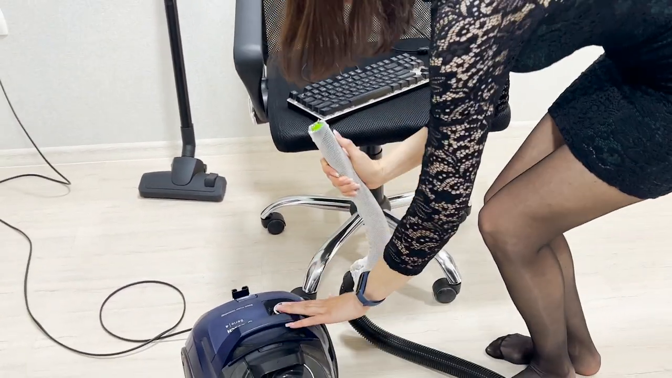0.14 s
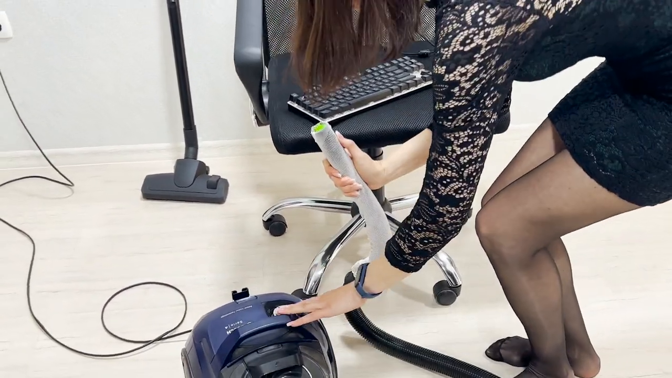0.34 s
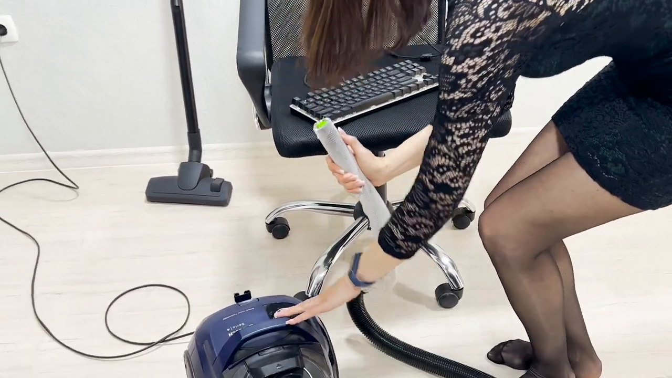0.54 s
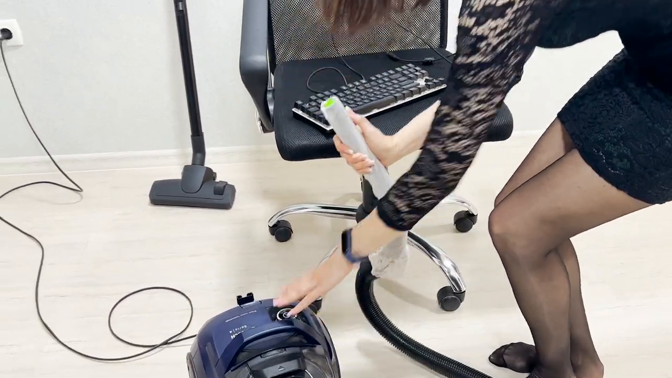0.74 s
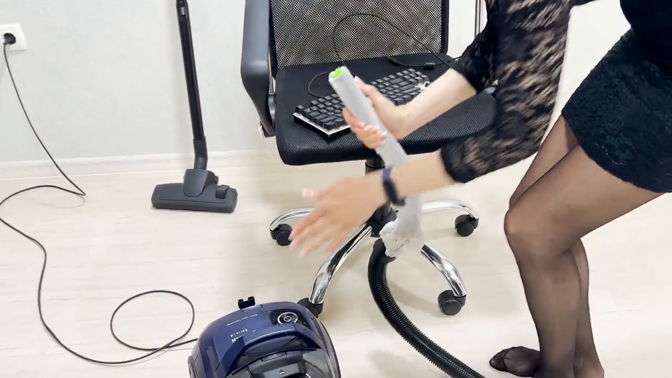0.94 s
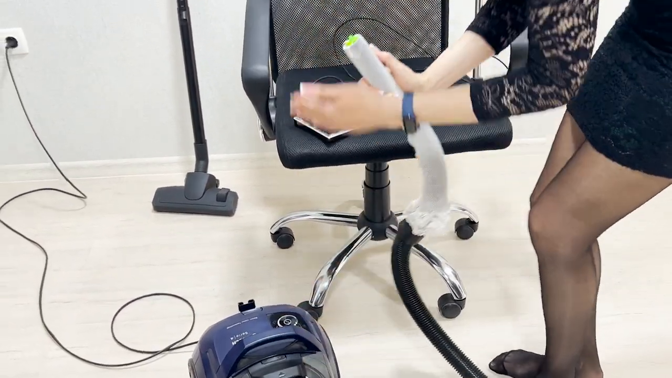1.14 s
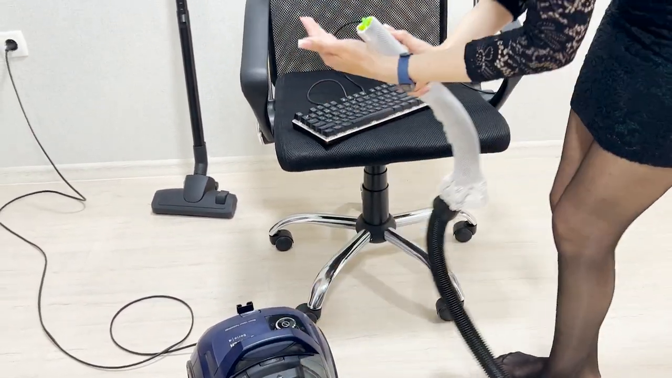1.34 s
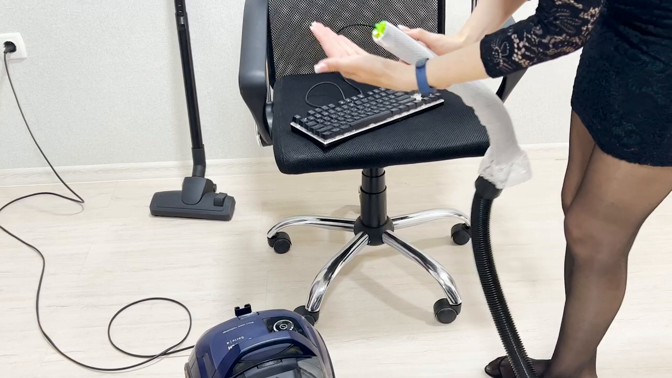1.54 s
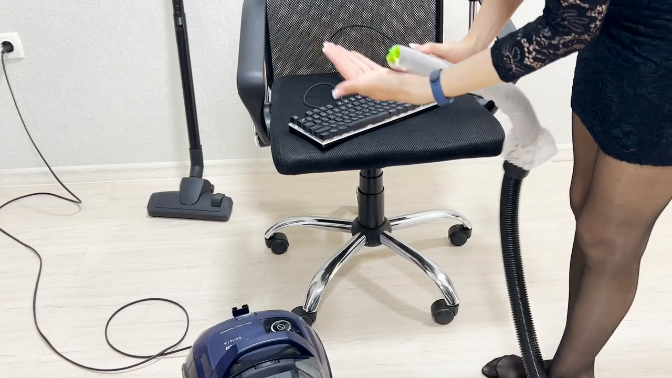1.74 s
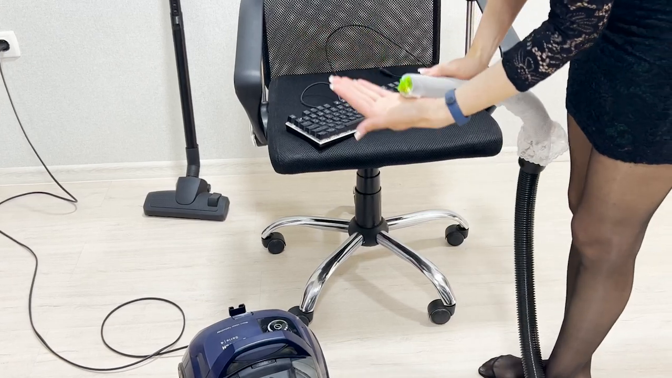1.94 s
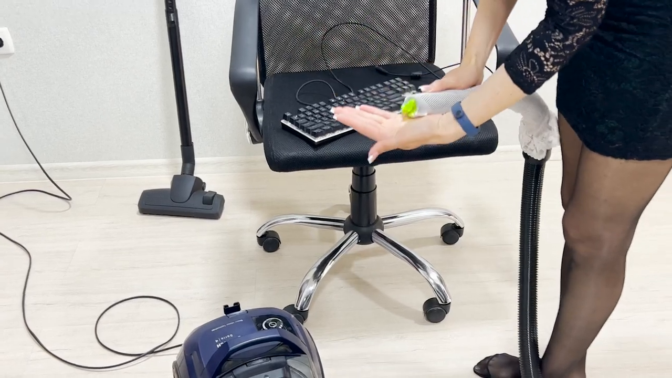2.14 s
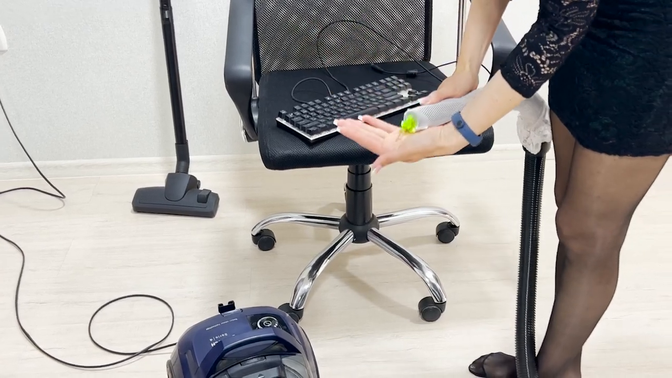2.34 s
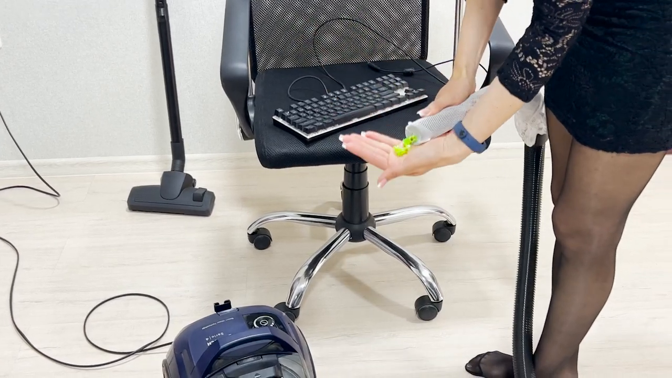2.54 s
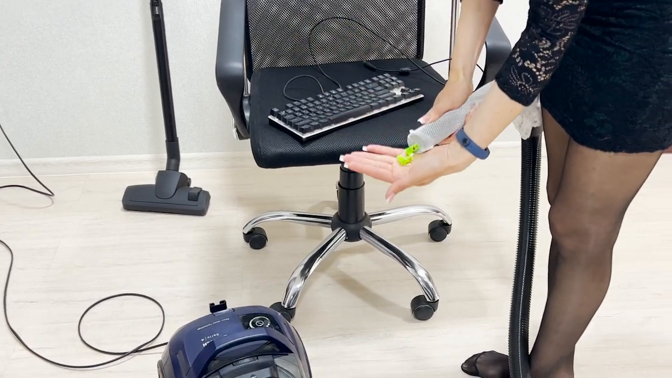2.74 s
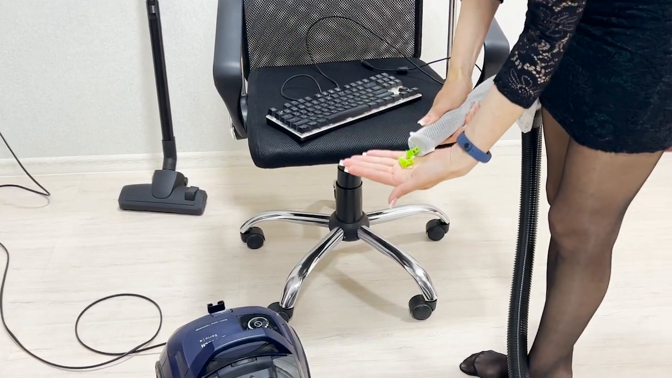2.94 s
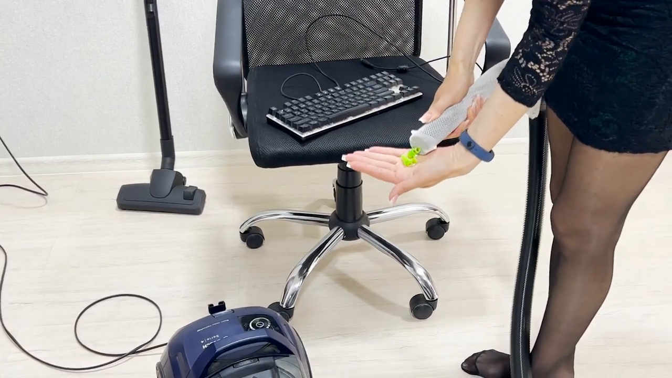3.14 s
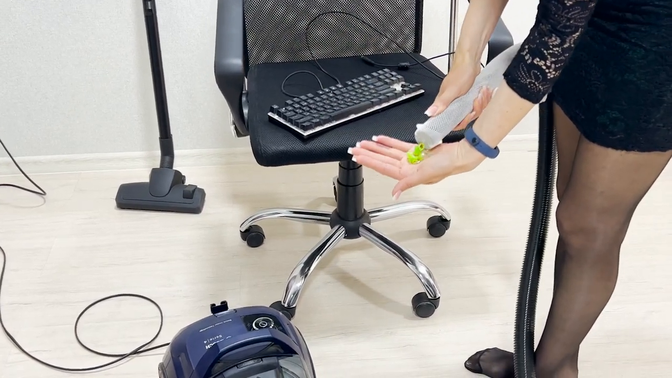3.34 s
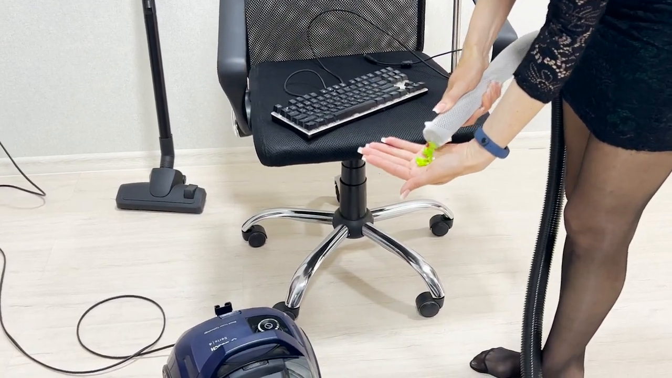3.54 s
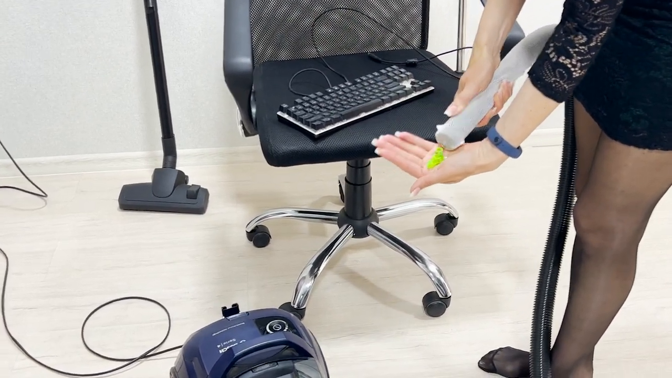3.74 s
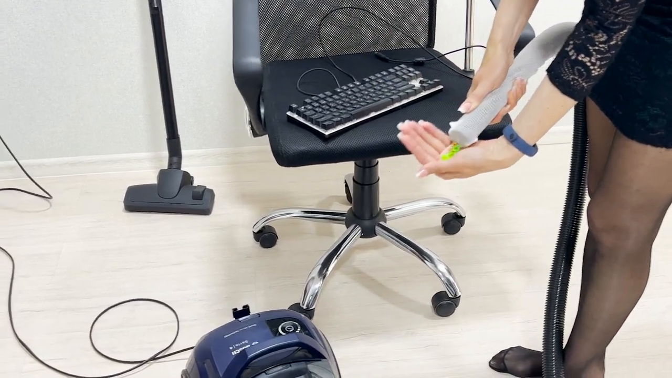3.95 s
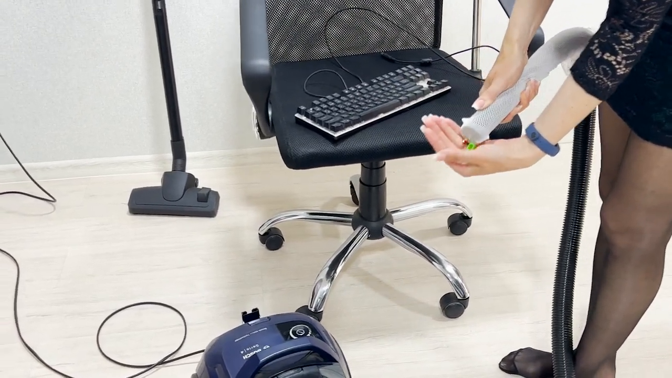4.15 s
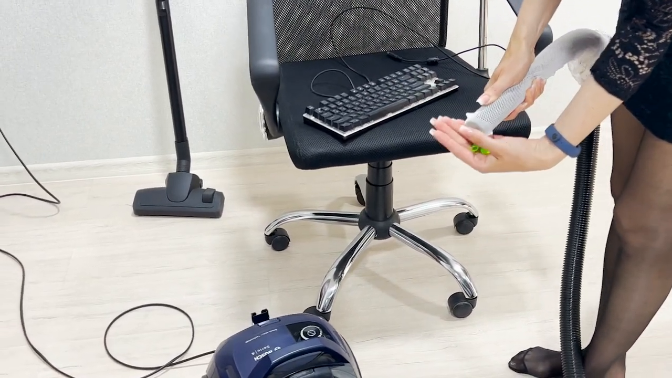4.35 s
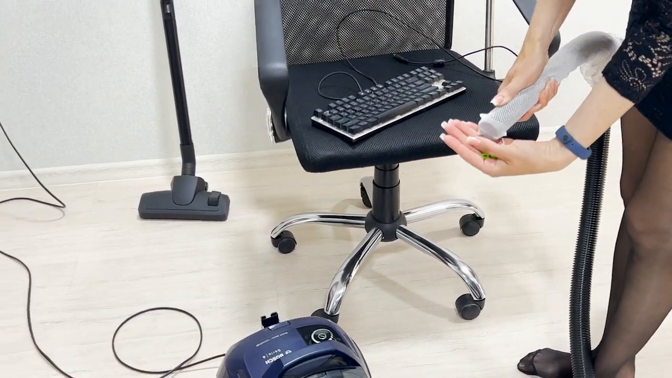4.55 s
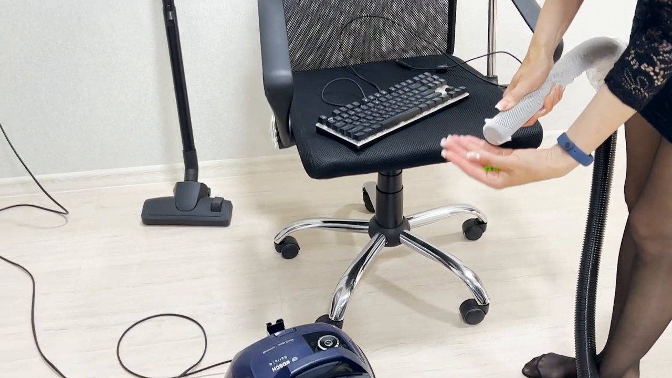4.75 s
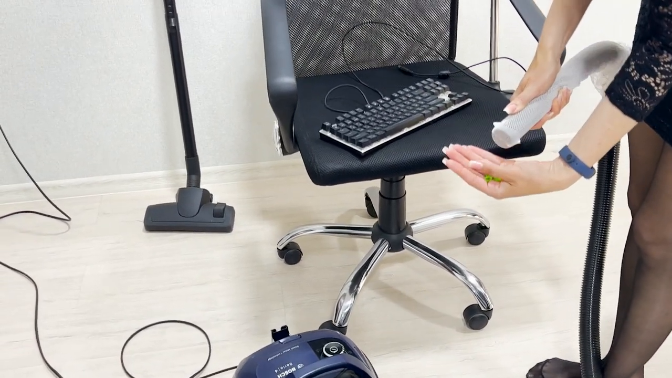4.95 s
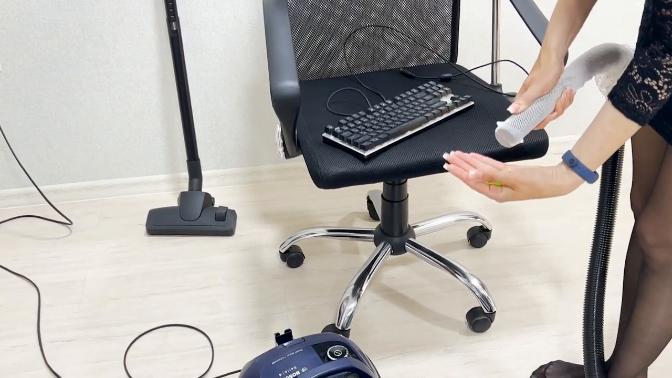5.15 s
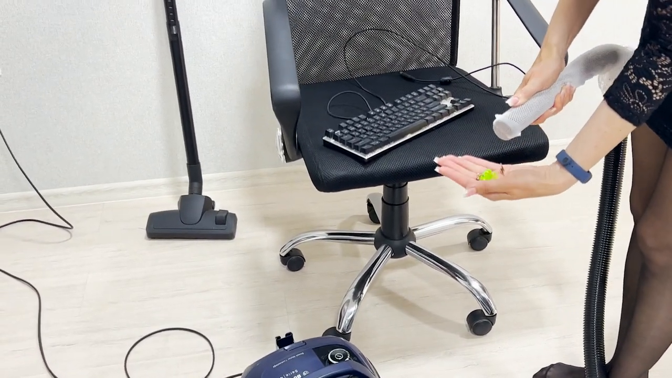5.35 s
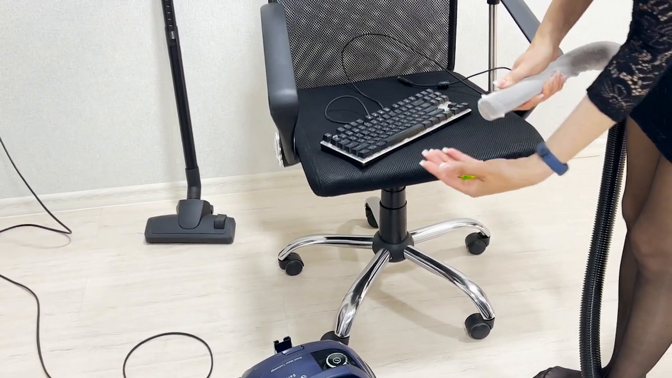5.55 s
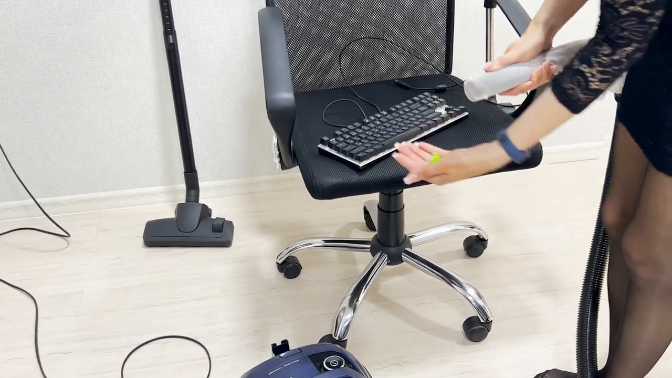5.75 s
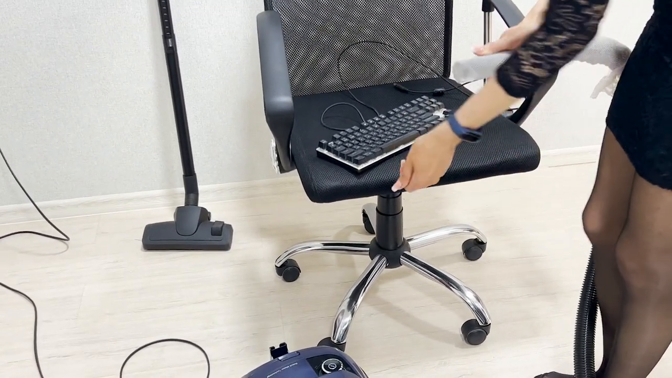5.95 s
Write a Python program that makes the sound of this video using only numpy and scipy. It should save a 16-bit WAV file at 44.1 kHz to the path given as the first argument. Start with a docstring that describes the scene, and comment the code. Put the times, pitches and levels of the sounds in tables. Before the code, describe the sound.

A canister vacuum cleaner roars and hisses through a mesh, is switched off, and whines down to quiet, followed by small plastic ticks and hose knocks.

```python
"""Vacuum cleaner coasting down

A canister vacuum cleaner sucks through a mesh cover in a small room, is switched off and coasts to a stop.
Fan and motor tones are waves that follow the turning shaft; the roar and hiss of air are coloured noise.
As they die away, plastic parts tick and the nozzle rubs over a palm; later the plastic hose knocks and thuds.
The rubs are grainy noise, the knocks short noise with ringing tones. Two microphone ports listen nearby."""
import sys
import numpy as np
from scipy import signal
from scipy.fft import rfft, irfft, next_fast_len
from scipy.io import wavfile
from scipy.ndimage import map_coordinates

SR = 44100
rng = np.random.default_rng(int(sys.argv[2]) if len(sys.argv) > 2 else 0)


def unload_audio(sound):
    """Save the sound as a 16-bit wav file, at the path given as the first command line argument."""
    columns = np.transpose(np.atleast_2d(sound))
    # keep every value between -1 and 1, then stretch to whole-number steps
    steps = np.round(np.clip(columns, -1, 1) * 32767)
    wavfile.write(sys.argv[1], SR, steps.astype(np.int16))


N = 264600  # length in samples, six seconds

# The rotor: full speed in turns per s, and the moment it is switched off in s
FULL_SPEED, OFF_S = 550, .644
# Braking: steady friction and, at full speed, air drag (turns per s lost each s); drag follows a power of speed
FRICTION, DRAG, DRAG_POWER = 47, 535, 2.1
# Cycles per turn of the bearing tone, fan blades, commutator bars and breathy fan whistle
BEARING_ORDER, BLADES, BARS, WHISTLE_ORDER = 4.45, 9, 20, 14.6
# Depth of the random flutter of shaft tones in dB, at rest and at full speed
FLUTTER_SLOW_DB, FLUTTER_FAST_DB = 3, 1
# The brush whine fades under this speed in turns per s
BRUSH_FADE_SPEED = 34

# Each machine sound: full-speed level in dB before any later filter, room or drift; power of speed it follows
UNBALANCE_DB, UNBALANCE_POWER = -45.5, 1
BLADE_DB, BLADE_POWER = -42, 1.05
WHISTLE_DB, WHISTLE_POWER = -36.5, .7
BRUSH_HISS_DB, BRUSH_HISS_POWER = -49.5, 1.6
HUM_DB, HUM_POWER = -44.5, 1.35
ROAR_DB, ROAR_POWER = -32.5, 1.718
DRONE_DB, DRONE_POWER = -48, 2
SHAKE_DB, SHAKE_POWER = -56, 1.4
JET_DB, JET_POWER = -33, 1.64
MESH_DB, MESH_POWER = -26, 3.28

# The air lags behind the fan (s); well under a speed (turns per s) it flows smoothly, leaving a remnant of hiss (dB)
AIR_LAG_S, SMOOTH_SPEED, SMOOTH_STEEPNESS, SMOOTH_DB = 0.035, 193, 9.1, -23.5
# Steady background levels in dB
RUMBLE_FLOOR_DB, ROOM_HISS_DB = -68, -72.5
# Upper edge of the treble in Hz
TOP_HZ = 15350

# Brief swell of the unbalance tone at full speed: middle t/s, length/s, level/dB
UNBALANCE_SWELL = [(.05, .4, -32)]
# Resonances of the motor on its mounts, shaken by the unbalance: f/Hz, width/Hz, level/dB
MOUNT_RESONANCES = [(443, 21, 1.5), (374, 50, 4), (248, 22, 2.5), (205.5, 18, -5)]
# The bearing sings out as the rotor slows: middle t/s, length/s, level/dB
BEARING_SONG = [(2.17, 0.16, -49.5), (2.35, 0.22, -41), (2.64, 0.28, -52), (2.84, 0.23, -49.5)]
# Pitches of the blade tone that the exhaust passage favours: f/Hz, level/dB
EXHAUST_COLOUR = [(380, -22.5), (550, 1), (660, -2), (810, 6), (1040, -0.5), (1200, 6.5), (1430, -4.5),
                  (1800, -2), (2290, 0), (3400, -2.5), (4300, 5), (5000, 0.5)]
# Tone of the brushes striking the commutator: multiple of the striking rate, level/dB
BRUSH_HARMONICS = [(1, -70), (2, -75.5), (3, -90.5), (4, -91)]
# The motor casing lets the brushes sing in two bands: f/Hz, level/dB
CASING_COLOUR = [(350, -26), (550, 0.5), (730, 4.5), (1000, -7), (1250, -2), (1500, -18.5), (1820, -14.5),
                 (2020, -3), (2500, 0), (3200, -1.5), (4200, -21)]
# The band in which the fan whistles: f/Hz, level/dB
WHISTLE_COLOUR = [(1200, -50.5), (1900, -20), (2500, -21.5), (3900, -23), (4650, -2.5), (5250, -5),
                  (5900, -2.5), (6450, 3), (6900, 4.5), (7900, -12.5)]
# Colour of the air's roar: f/Hz, level/dB
ROAR_COLOUR = [(80, -38), (250, -9.5), (350, -5), (600, -4.5), (1300, -2), (1700, -8), (2600, -13),
               (3500, -27.5), (8000, -51)]
# Resonances of hose and canister: f/Hz, width/Hz, level/dB
PIPE_RESONANCES = [(360.3, 24, 0.5), (437, 19, 1), (484, 40, 0.5), (567, 64, 0.5), (643, 23, 0.5),
                   (780, 150, -0.5), (884, 25, 1), (1100, 87, -3), (1195.5, 28, 3), (1356, 21, -1.5),
                   (1733, 53, -2.5)]
# Deeper resonances that colour the hum: f/Hz, width/Hz, level/dB
DRUM_RESONANCES = [(143.7, 30, -2.7), (191, 54, -9)]
# Hollow booms of the hose as it is handled: middle t/s, length/s, level/dB
BOOMS = [(2.38, 0.18, -54.5), (2.56, 0.24, -55.5), (2.82, 0.38, -58), (3.27, 0.44, -53.5),
         (3.5, 0.32, -56.5), (4.1, 0.99, -67.5), (4.71, 0.23, -62)]
# Colour of the broad jet of air: f/Hz, level/dB
JET_COLOUR = [(500, -27), (1500, 4.5), (2200, 2), (3500, 1.5), (5000, 0.5), (5700, -5.5), (6600, -5),
              (7500, -9.5), (9000, -5.5), (11500, -7), (15000, -7.5), (16000, -5.5)]
# Colour of the sharp hiss in the mesh: f/Hz, level/dB
MESH_COLOUR = [(2500, -32.5), (4200, -18.5), (5000, -11.5), (5700, -9.5), (6500, -5.5), (7000, -7),
               (7900, -6.5), (9500, -9), (12000, -11.5), (15000, -12), (16000, -21.5)]
# Narrow resonances of the nozzle tube: f/Hz, width/Hz, level/dB
TUBE_RESONANCES = [(4980, 50, -9), (6420, 40, 0), (6590, 18, 7.5), (6900, 50, -6), (7342, 35, 4.5),
                   (7710, 41, -2.5)]
# Slow drift in the hiss: t/s, level/dB
HISS_DRIFT = [(0, 0), (.3, -0.84), (.55, 0.3), (.8, 0), (1.1, 0.7), (1.5, .5)]
# Thin squeals of air in the mesh: t/s, length/s, starting f/Hz, fall/(octaves per s), level/dB
SQUEALS = [(1.872, .06, 10200, .1, -54), (2.2, .18, 13200, .55, -61), (2.2, .2, 8080, .45, -68)]
# Strokes of the nozzle on the palm: middle t/s, length/s, level/dB
PALM_STROKES = [(3.23, 0.51, -66.5), (3.36, 0.13, -61.5), (3.48, 0.17, -63), (3.6, 0.25, -74)]
# Colour of the rub on skin: f/Hz, level/dB
RUB_COLOUR = [(400, -23.5), (1500, -5), (3500, 4.5), (4600, -1), (6300, 4), (8500, -2), (12000, -5),
              (15000, -1)]
# Knocks of the hose, levels relative to each other: t/s, level/dB, upper edge f/Hz (higher is harder)
KNOCKS = [(4.729, -48, 9130), (4.74, -47.5, 4800), (4.766, -51, 4000), (4.981, -59.5, 1190)]
# Colour of the crack of a knock, also the body of a tick: f/Hz, level/dB
CRACK_COLOUR = [(100, -4), (380, -7), (560, 1), (800, -5), (1400, -5.5), (2300, -10), (3200, -18),
                (4400, -17), (5600, -24), (6800, -11.5), (7600, -21), (14000, -30)]
# Ringing tones of the knocked hose, levels relative to each other: f/Hz, level/dB, time to fall by 60 dB/s
HOSE_TONES = [(168, -5.5, 0.54), (245, -8, 0.47), (498, 1, .32), (561, 2, 0.42), (632, -1, 0.4),
              (900, -20, .5), (1040, -28, .3), (1290, -17, 0.4), (1520, -18.5, .3), (1910, -19.5, .2),
              (2200, -25, 0.46), (6643, -27, .25), (6900, -13, .22)]
# The hose slides after its knocks: middle t/s, length/s, level/dB
HOSE_SLIDES = [(5.005, 0.041, -63), (5.08, 0.2, -61.5)]
# Colour of the sliding hose: f/Hz, level/dB
SLIDE_COLOUR = [(100, 6), (300, 4), (520, 2), (900, 5.5), (1400, -15.5), (2300, -22), (3400, -18),
                (4500, -40.5), (9000, -46)]
# Small plastic ticks, levels relative to each other: t/s, level/dB, level of the body against the snap/dB
TICKS = [(2.454, -50, -16), (3.31, -37.5, -4), (3.3596, -44.5, -2), (3.4423, -41, -11), (3.4474, -47.5, 6),
         (3.481, -49, -8), (3.624, -49.5, -4), (4.658, -62.5, 13), (5.443, -47.5, -28), (5.905, -59.5, -10)]
# Colour of the snap of a tick: f/Hz, level/dB
SNAP_COLOUR = [(1000, 2), (4000, -17.5), (7000, 0), (10000, -3), (14000, -8), (16000, -1)]
# Dull thuds through the floor: t/s, level/dB, f/Hz, length/s
THUDS = [(4.717, -52, 39.7, 0.12), (5.008, -55, 43.1, 0.13), (5.103, -52, 37.3, 0.17)]
# Swells of low rumble while the person moves: middle t/s, length/s, level/dB
RUMBLE_SWELLS = [(3, 2.6, -63), (4.2, 1.4, -64), (4.95, .8, -59.5), (6, 0.29, -63)]
# Colour of the low rumble: f/Hz, level/dB
RUMBLE_COLOUR = [(15, -19.5), (28, -6.5), (55, 6.5), (90, 0), (130, -14), (300, -57)]
# Colour of the faint room hiss: f/Hz, level/dB
ROOM_COLOUR = [(60, -7), (120, 0.5), (240, 1), (330, -6), (550, -11.5), (780, -9.5), (1000, -3.5),
               (1600, -5.5), (2100, -19.5), (3600, -23), (8000, -31.5), (10000, -37), (15000, -40.5)]
# How long the room echoes: f/Hz, time to fall by 60 dB/s
ROOM_T60 = [(100, .42), (600, 0.36), (3000, 0.17), (7000, 0.3), (15000, 0.13)]
# How alike a room sound is at the two ports: f/Hz, likeness (1 is identical)
PORT_LIKENESS = [(30, 0.93), (300, .88), (800, 0.4), (1500, 0.19), (2300, 0.87), (4500, 0.48), (5400, .4),
                 (6500, 0.91), (9000, 0.93), (9600, 1), (10250, 1), (11000, 0.29), (13000, 0.44),
                 (15000, .8)]
# Left port against right: f/Hz, level difference/dB
PORT_LEAN = [(40, 1.5), (150, 2.5), (650, 4.5), (1100, 2.5), (1500, 0.5), (1900, 2), (4700, 1.5), (5500, 0),
             (15000, -0.5)]
# Left port ahead of right: f/Hz, phase lead/rad
PORT_LEAD = [(30, 0), (500, .1), (1100, .5), (3000, .55), (5000, .1), (5600, -1.1), (6800, -.1), (8100, -1),
             (9600, -3.05), (10300, -3.25), (12400, -6.2), (13500, -6.4), (15400, -9.4)]


def rotor_speed(lag_s=0):
    """Speed as a share of full speed: steady, then coasting against drag and friction."""
    share = np.linspace(1, 0, SR)
    braking = FRICTION + DRAG * share ** DRAG_POWER
    # add up the time spent on each small loss of speed
    reached_s = OFF_S + np.cumsum(FULL_SPEED / len(share) / braking)
    return np.interp(np.arange(N) / SR - lag_s, reached_s, share)


def rotor_angle(speed):
    """The angle of the shaft in radians, with a slight waver in its speed."""
    turns_per_s = FULL_SPEED * speed * (1 + .0018 * wobble(18))
    return 2 * np.pi * np.cumsum(turns_per_s) / SR


def motor(speed, angle):
    """Shaft, bearing, blades and brushes sound at multiples of shaft speed, sliding through body resonances."""
    unbalance_gain = np.hypot(amp(UNBALANCE_DB) * speed ** UNBALANCE_POWER, swells(UNBALANCE_SWELL))
    shaking = unbalance_gain * tone(angle, speed)
    mounts = ringing(MOUNT_RESONANCES, leak_db=-8)
    bass_cut = above(edge_hz=185, order=10)
    unbalance = filtered(shaking, lambda hz: bass_cut(hz) * mounts(hz))

    bearing = swells(BEARING_SONG) * tone(BEARING_ORDER * angle, speed)

    chopping = amp(BLADE_DB) * speed ** BLADE_POWER * tone(BLADES * angle, speed)
    blades = filtered(chopping, colour(EXHAUST_COLOUR))

    whine = sum(amp(db) * tone(round(k) * BARS * angle, speed) for k, db in BRUSH_HARMONICS)
    hiss = amp(BRUSH_HISS_DB) * speed ** BRUSH_HISS_POWER * narrow_band(BARS * angle, width_hz=600)
    whine_fade = np.minimum(FULL_SPEED * speed / BRUSH_FADE_SPEED, 1) ** 2
    brushes = filtered(whine_fade * whine + hiss, colour(CASING_COLOUR))
    return in_room(unbalance + bearing + blades + brushes, wet_db=-4)


def fan_whistle(speed, angle):
    """A breathy whistle whose pitch follows the fan."""
    breath = narrow_band(WHISTLE_ORDER * angle, width_hz=520)
    whistle = amp(WHISTLE_DB) * speed ** WHISTLE_POWER * breath
    return in_room(filtered(whistle, colour(WHISTLE_COLOUR)), wet_db=2.0)


def duct(speed):
    """Swirling air sounds the fixed resonances of canister and hose; handling adds booms in the hose."""
    def drum_response(hz):
        return resonances(DRUM_RESONANCES)(hz) / (1 + (hz / 420) ** 4) / (1 + (95 / (hz + 1)) ** 4)

    pipe_ringing = ringing(PIPE_RESONANCES, leak_db=-10.5)
    drum = rush(drum_response)
    pipe = rush(lambda hz: colour(ROAR_COLOUR)(hz) * pipe_ringing(hz))
    hollow = rush(lambda hz: resonances([(280, 85, 0)])(hz) ** 2)

    hum_gain = amp(HUM_DB) * speed ** HUM_POWER
    roar_gain = amp(ROAR_DB + .5 * wobble(16)) * speed ** ROAR_POWER
    drone_gain = np.hypot(amp(DRONE_DB) * speed ** DRONE_POWER, swells(BOOMS))
    return hum_gain * drum + roar_gain * pipe + drone_gain * hollow


def nozzle():
    """A broad jet, and a mesh hiss that needs strong suction, ring the tube and fade as the flow turns smooth."""
    def through_tube(points):
        tube = lambda hz: np.hypot(1, amp(3.0) * resonances(TUBE_RESONANCES)(hz))
        return rush(lambda hz: colour(points)(hz) * tube(hz))

    flow = rotor_speed(lag_s=AIR_LAG_S)
    excess = (flow * FULL_SPEED / SMOOTH_SPEED) ** SMOOTH_STEEPNESS
    turbulence = (excess + amp(SMOOTH_DB)) / (excess + 1)
    jet = amp(JET_DB) * flow ** JET_POWER * through_tube(JET_COLOUR)
    mesh = amp(MESH_DB) * flow ** MESH_POWER * through_tube(MESH_COLOUR)
    drift_db = np.interp(np.arange(N) / SR, *np.transpose(HISS_DRIFT))
    flicker_db = .25 * wobble(25) + .3 * wobble(400)
    return turbulence * (jet + mesh) * amp(drift_db + flicker_db)


def squeals():
    """Air squeals briefly in the mesh as the flow drops: falling tones with a trembling pitch."""
    out = np.zeros(N)
    for s, length, hz, fall, db in SQUEALS:
        t = since(s)
        pitch = hz * 2 ** (-fall * t) * (1 + 0.0078 * wobble(590))
        swell = np.sin(np.pi * np.minimum(t / length, 1))
        out += amp(db) * swell * np.sin(2 * np.pi * np.cumsum(pitch) / SR)
    return in_room(out, wet_db=4)


def hose():
    """Each knock cracks and rings the hollow plastic; soft knocks lose their treble. Slides scuff."""
    cracks, rings = np.zeros(N), np.zeros(N)
    for s, db, edge_hz in KNOCKS:
        soft = lambda hz: 1 / (1 + (hz / edge_hz) ** 2)
        crack = unit(filtered(rng.standard_normal(N), colour(CRACK_COLOUR)))
        cracks += amp(db + 3.5) * filtered(crack * decay(s, t60=0.11), soft)
        for hz, level, t60 in HOSE_TONES:
            ring = decay(s, t60) * np.sin(2 * np.pi * hz * since(s))
            rings += amp(db + level) * soft(hz) * ring
    grains = amp(2.0 * wobble(90))
    scuff = swells(HOSE_SLIDES) * unit(rush(colour(SLIDE_COLOUR)) * grains)
    return in_room(cracks, wet_db=1) + amp(-3.5) * rings + scuff


def palm():
    """The mesh scrapes over skin in small grains."""
    grains = amp(2 * wobble(300))
    return swells(PALM_STROKES) * unit(rush(colour(RUB_COLOUR)) * grains)


def ticks():
    """Plastic parts snap against each other: very short bursts of noise."""
    snap = unit(filtered(rng.standard_normal(N), colour(SNAP_COLOUR)))
    body = unit(filtered(rng.standard_normal(N), colour(CRACK_COLOUR)))
    bursts = np.zeros(N)
    for s, db, body_db in TICKS:
        bursts += amp(db - 3) * decay(s, t60=.012) * (snap + amp(body_db) * body)
    return in_room(bursts, wet_db=3.0)


def thuds():
    """Shifting weight sways the floor for a few cycles."""
    out = np.zeros(N)
    for s, db, hz, length in THUDS:
        t = since(s)
        swell = np.sin(np.pi * np.minimum(t / length, 1))
        out += amp(db) * swell * np.sin(2 * np.pi * hz * t)
    return out


def room_tone(speed):
    """Low rumble, stronger while the machine shakes the floor or the person moves, and a faint steady hiss."""
    shake = amp(SHAKE_DB) * speed ** SHAKE_POWER
    rumble_gain = np.sqrt(amp(RUMBLE_FLOOR_DB) ** 2 + shake ** 2 + swells(RUMBLE_SWELLS) ** 2)
    rumble = rumble_gain * rush(colour(RUMBLE_COLOUR))
    return rumble + amp(ROOM_HISS_DB) * rush(colour(ROOM_COLOUR))


def in_room(x, wet_db):
    """Direct sound plus the fading echo of the bare room, at about unchanged power."""
    hz, t, z = signal.stft(rng.standard_normal((2, SR // 2)), SR, nperseg=256)
    fade = amp(-60 * t / along(ROOM_T60, hz)[:, None])
    tail = signal.istft(z * fade, SR, nperseg=256)[1]
    echo = signal.fftconvolve(x[None], tail / np.linalg.norm(tail[0]), axes=1)[:, :N]
    return (x + amp(wet_db) * at_ports(echo)) / np.hypot(1, amp(wet_db))


def at_ports(pair):
    """Two unrelated signals become as alike as a room sound is at the two ports."""
    def mix(hz):
        turn = np.arccos(np.clip(along(PORT_LIKENESS, hz), -1, 1)) / 2
        return np.array([np.cos(turn), np.sin(turn)])

    mid, side = filtered(pair, mix)
    return np.array([mid + side, mid - side])


def rush(response):
    """Stereo coloured noise of rms 1."""
    return unit(at_ports(filtered(rng.standard_normal((2, N)), response)))


def tone(phase, speed):
    """A shaft tone that flutters in level and phase, its level more so as the rotor slows."""
    depth_db = FLUTTER_SLOW_DB + (FLUTTER_FAST_DB - FLUTTER_SLOW_DB) * speed
    flutter_db = depth_db * (.8 * wobble(22) + .7 * wobble(110))
    return amp(flutter_db) * np.sin(phase + .35 * wobble(130))


def narrow_band(phase, width_hz):
    """Noise of rms 1 in a narrow band around a moving pitch."""
    return unit(wobble(width_hz) * np.cos(phase) + wobble(width_hz) * np.sin(phase))


def wobble(rate):
    """A smooth random curve through `rate` random points a second."""
    points = rng.standard_normal(int(N * rate / SR) + 4)
    return map_coordinates(points, [np.arange(N) * rate / SR])


def swells(rows):
    """A gain curve with one smooth bell for each (middle, length, dB) row."""
    t = np.arange(N) / SR
    return np.sqrt(sum(amp(db) ** 2 * np.exp(-np.pi * (2 * (t - s) / length) ** 2)
                       for s, length, db in rows))


def since(s):
    """Seconds since a moment, zero before it."""
    return np.maximum(np.arange(N) / SR - s, 0)


def decay(s, t60):
    """An envelope that jumps up at s and falls by 60 dB in t60 seconds."""
    t = since(s)
    return (t > 0) * np.exp(-np.log(1000) * t / t60)


def filtered(x, response):
    """Multiply the spectrum of x by a response that depends on frequency."""
    size = next_fast_len(N + SR // 2)
    return irfft(rfft(x, size) * response(np.fft.rfftfreq(size, 1 / SR)), size)[..., :N]


def colour(points):
    """The response of a (Hz, dB) spectrum."""
    return lambda hz: amp(along(points, hz))


def resonances(modes):
    """The gain of (Hz, width, dB) peaks."""
    def peak_power(hz, centre, width, db):
        return amp(db) ** 2 / (1 + (2 * (hz - centre) / width) ** 2)

    return lambda hz: np.sqrt(sum(peak_power(hz, *mode) for mode in modes))


def ringing(modes, leak_db):
    """The gain of resonances that stand out of a flat leak."""
    return lambda hz: np.hypot(amp(leak_db), resonances(modes)(hz))


def above(edge_hz, order=4):
    """The response of a filter that cuts what lies below the edge."""
    return lambda hz: 1 / np.hypot(1, (edge_hz / (hz + 1)) ** order)


def along(points, hz):
    """(Hz, value) points read on a logarithmic frequency axis."""
    f, v = np.transpose(points)
    return np.interp(np.log(hz + 1), np.log(f + 1), v)


def amp(db):
    """Decibels to gain."""
    return 10 ** (np.asarray(db) / 20)


def unit(x):
    """Scale to rms 1."""
    return x / np.sqrt(np.mean(x ** 2) + 1e-20)


def scene():
    """The machine, driven by the speed of its rotor, with the handling noises and the room."""
    speed = rotor_speed()
    angle = rotor_angle(speed)
    machine = motor(speed, angle) + fan_whistle(speed, angle) + duct(speed) + nozzle() + squeals()
    handling = hose() + palm() + ticks() + thuds()
    return machine + handling + room_tone(speed)


def record(dry):
    """The two ports differ in level and phase; the deepest bass is cut and the treble ends steeply."""
    half = np.array([[.5], [-.5]])  # each port takes half of the difference

    def response(hz):
        ports = amp(half * along(PORT_LEAN, hz)) * np.exp(1j * half * along(PORT_LEAD, hz))
        treble_end = 1 / np.hypot(1, (hz / TOP_HZ) ** 150)
        return ports * treble_end * above(edge_hz=28)(hz)

    return filtered(dry, response)


dry = scene()
out = record(dry)
unload_audio(out)
```